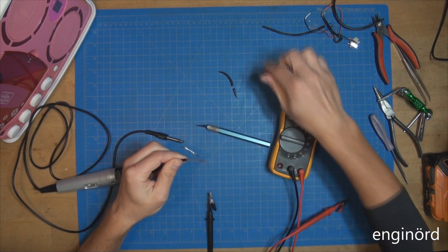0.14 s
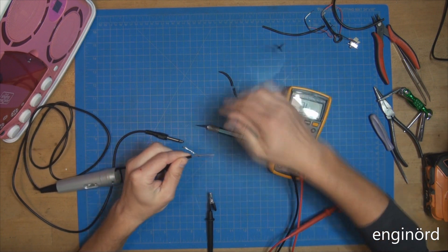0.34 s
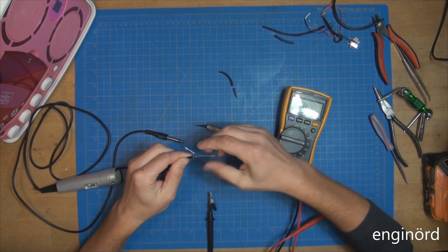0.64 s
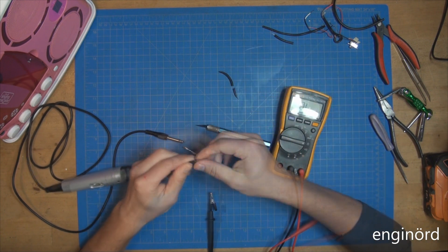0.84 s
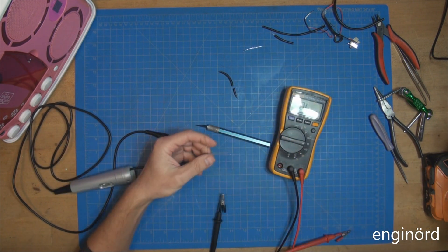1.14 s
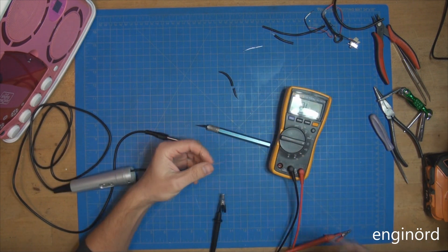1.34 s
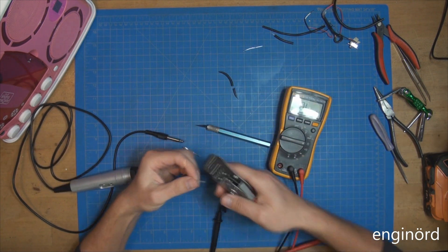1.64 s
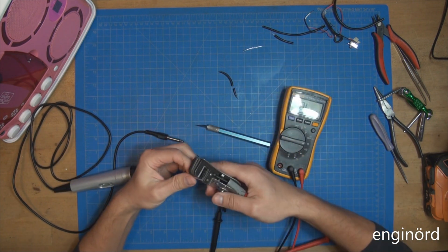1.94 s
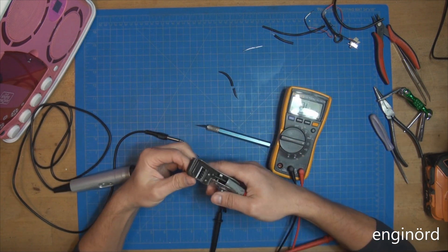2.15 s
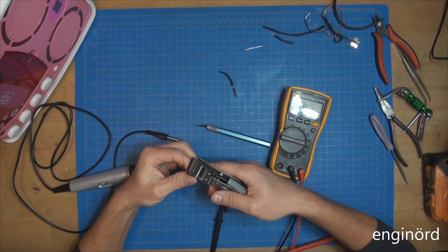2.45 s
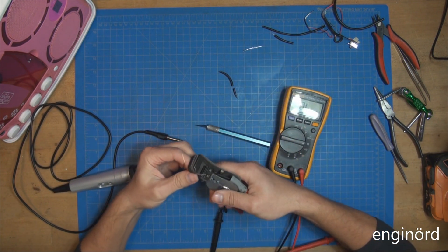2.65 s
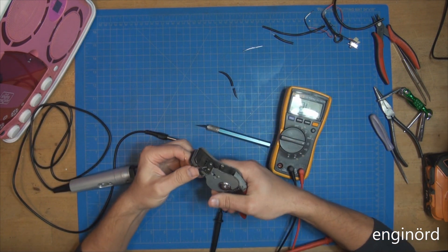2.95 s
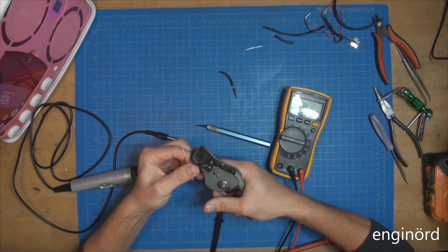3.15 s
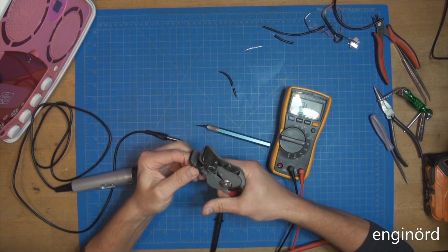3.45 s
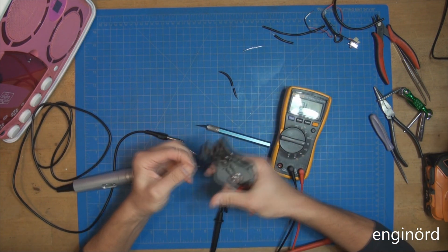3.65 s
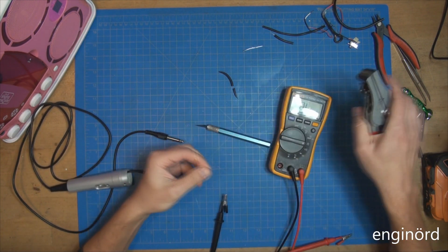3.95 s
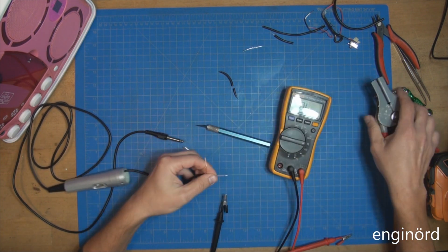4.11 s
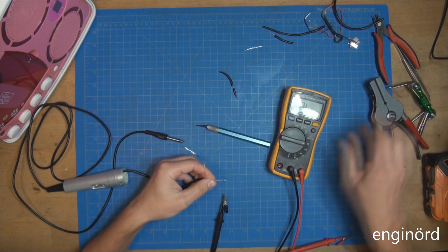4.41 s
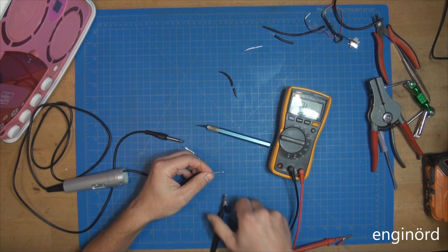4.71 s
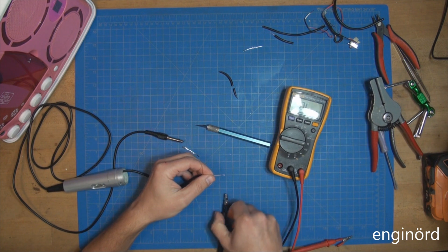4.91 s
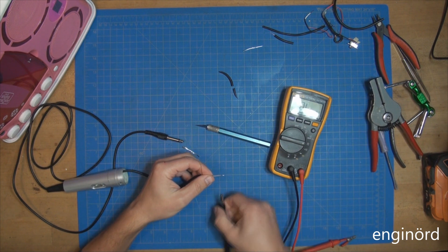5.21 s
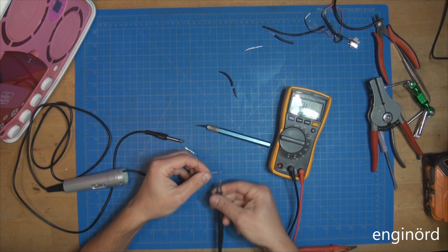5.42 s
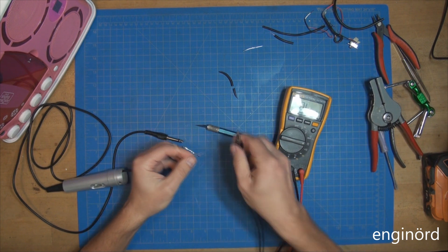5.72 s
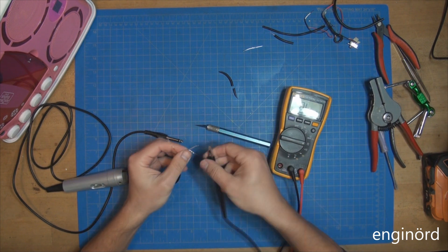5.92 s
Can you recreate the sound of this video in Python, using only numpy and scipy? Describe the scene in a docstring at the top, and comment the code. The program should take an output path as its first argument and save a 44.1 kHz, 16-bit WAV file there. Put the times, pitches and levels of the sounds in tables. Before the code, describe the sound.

At a workbench in a small quiet room, a sharp cluster of plastic clacks comes first while something faintly rocks to rest. Light rustling and tiny metallic clicks follow as a wire stripper works a thin cable and snaps. Its jaws spring with a bright clatter, it is put down with wooden knocks, and small leads scrape and tap. Close, dry microphone, with faint steady hiss.

```python
"""Hands work at a wooden bench under a cutting mat: plastic parts are tapped down, a spring-loaded steel wire stripper
clicks, snaps through a cable and is laid down. Blows are noise bursts ringing damped modes, plus crack and rattle.
The bench top knocks, something rocks to rest in gliding tones, leads and sleeves slide as filtered friction noise.
A small quiet room adds a diffuse tail and a steady tone; each of the two channels adds its own hiss."""
import sys
import numpy as np
from scipy import signal
from scipy.fft import rfft, irfft
from scipy.io import wavfile
from scipy.ndimage import uniform_filter1d

SR = 44100
rng = np.random.default_rng(int(sys.argv[2]) if len(sys.argv) > 2 else 0)


def persist_wave(psi):
    """Save psi, clipped to +-1, as 16-bit WAV."""
    counts = np.round(np.clip(psi, -1, 1) * 32767).astype(np.int16)
    wavfile.write(sys.argv[1], SR, np.atleast_2d(counts).T)


N = 267687


def amp(db):
    """Decibels to gain."""
    return 10 ** (np.asarray(db) / 20)


def rms_one(x):
    """Scale to unit rms."""
    return x / np.sqrt(np.mean(x ** 2) + 1e-20)


def at_hz(points, hz):
    """Read a (frequency [Hz], value) table on a log frequency axis."""
    p = np.array(points)
    return np.interp(np.log(np.maximum(hz, 1)), np.log(p[:, 0]), p[:, 1])


def coloured(x, spectrum):
    """Shape a signal by a (frequency [Hz], gain [dB]) table."""
    gain = amp(at_hz(spectrum, np.fft.rfftfreq(len(x), 1 / SR)))
    return irfft(rfft(x) * gain, len(x))


def band(x, low_hz, high_hz):
    """Gentle band-pass, edges held inside the usable range."""
    edges_hz = [max(low_hz, 20), min(high_hz, .45 * SR)]
    return signal.sosfilt(signal.butter(1, edges_hz, "band", fs=SR, output="sos"), x)


def drift(rate_hz):
    """Slow random wander of unit rms: noise through a double one-pole low-pass."""
    r = np.exp(-2 * np.pi * rate_hz / SR)
    wander = signal.lfilter([1], [1, -2 * r, r * r], rng.standard_normal(N + SR))
    return rms_one(wander[SR:])   # start-up dropped


def swell(n):
    """A stroke sets in and lets go quickly: root of a half sine."""
    return np.sin(np.pi * np.arange(n) / n) ** .5


def grit(rough_db):
    """Friction noise with a lumpy grain: white noise of wandering level."""
    return rms_one(rng.standard_normal(N) * amp(rough_db * drift(132)))


RATTLE_SPREAD = 1.35   # factor above and below the strongest pitch
CHATTER_DB_PER_BLOW_DB, USUAL_BLOW_DB = 0.093, -29.5   # a harder blow chatters longer


def blows(events, modes, focus_db_per_octave, damping, first, chatter_ms, rattle_db, tail_ms,
          low_hz, top_hz, soft_hz):
    """First contact and dying chatter ring damped modes near the strongest pitch and crack; a rattle trails."""
    out, t = np.zeros(N + SR), np.arange(SR // 5) / SR
    mode_hz, mode_db, t60_s = np.transpose(modes)[:, :, None]
    rings = np.sin(2 * np.pi * mode_hz * t) * amp(-60 * t * damping / t60_s)
    too_small = signal.butter(3, low_hz, "high", fs=SR, output="sos")   # a small body radiates nothing deeper
    noises = rng.standard_normal((len(events), len(t)))
    strike_spots_db = 2 * rng.standard_normal((len(events), len(modes), 1))   # where exactly the part is struck

    for (start_s, level_db, centre_hz, crack_db), noise, spot_db in zip(events, noises, strike_spots_db):
        decay_ms = chatter_ms * amp(CHATTER_DB_PER_BLOW_DB * (level_db - USUAL_BLOW_DB))
        force = noise * np.exp(-1000 * t / decay_ms)
        force[0] += first
        force = band(force, 18, soft_hz)   # a softer contact builds up more slowly

        octaves_off = abs(np.log2(mode_hz / centre_hz))
        body = np.sum(rings * amp(mode_db - focus_db_per_octave * octaves_off + spot_db), axis=0)
        ringing = signal.fftconvolve(force, body)[:len(t)]
        crack = band(force, centre_hz / 5.5, top_hz)
        rattle = noise * abs(noise) * np.exp(-1000 * t / tail_ms)   # loose contacts come unevenly
        rattle = band(rattle, centre_hz / RATTLE_SPREAD, centre_hz * RATTLE_SPREAD)

        sound = rms_one(band(ringing, centre_hz / 0.95, 20000))
        sound += amp(crack_db) * rms_one(crack)
        sound += amp(rattle_db) * rms_one(rattle)
        sound = signal.sosfilt(too_small, sound)
        two_cycles = round(2 * SR / centre_hz)
        loudest = 2 * np.sqrt(uniform_filter1d(sound ** 2, size=two_cycles).max())
        i = round(start_s * SR)
        out[i:i + len(t)] += amp(level_db) * sound / loudest
    return out[:N]


# plastic parts on the mat: (time [s], level [dB], strongest pitch [Hz], crack re ringing [dB])
TAPS = [(.1974, -38.5, 1990, -10), (.4372, -10.5, 2800, -3), (.4392, -8, 2660, -3), (.611, -5, 2080, -12),
        (.6204, -21, 2330, -11.5), (.6528, -31, 1920, -20), (.6675, -12, 2200, 4), (.6913, -24, 2100, -3),
        (.701, -29, 2060, 14), (.817, -41, 2220, -10), (1.1148, -33.5, 2320, -10), (1.628, -39.5, 2250, -2),
        (3.829, -23, 1380, -31), (4.6525, -21.5, 2330, -11), (4.697, -5, 2720, -9),
        (4.7348, -15, 2800, -25), (4.7697, -24, 1770, -26), (4.7945, -28.5, 2780, -21),
        (4.8264, -31, 2980, -12), (4.9869, -29, 2880, -17), (5.0902, -32, 2550, -8),
        (5.212, -29, 3250, -19), (5.2634, -33.5, 2730, -16), (4.8564, -36.5, 4230, -22),
        (5.4688, -49.5, 2940, -16), (5.6288, -25, 3060, -4), (5.6451, -26, 2040, -14),
        (5.9092, -36, 1487, -14), (5.9888, -28, 2080, -10), (6.0, -26, 1980, -10)]
# plastic modes: (frequency [Hz], level [dB], t60 before damping [s])
PLASTIC_MODES = [(900, -12, .012), (1308, -8, .012), (1782, -3, .012), (2056, -2, .014), (2300, -1, .014),
                 (2713, -1, .012), (3110, 0, .01), (3640, -2, .008), (4100, -5, .008), (4683, -8, .007),
                 (5486, -10, .006), (6616, -12, .005), (7704, -14, .005), (8699, -14, .005)]


def plastic_taps():
    """Light plastic bodies: short modes, no bass."""
    return blows(TAPS, PLASTIC_MODES, focus_db_per_octave=21, damping=1.6, first=6.95, chatter_ms=2.52,
                 rattle_db=-10, tail_ms=11, low_hz=1160, top_hz=7000, soft_hz=17600)


# jaws, pivot and spring of the stripper: (time [s], level [dB], strongest pitch [Hz], crack re ringing [dB])
CLICKS = [(1.5834, -34.5, 4000, 28), (2.2293, -19.5, 11300, 11), (2.2392, -42, 2760, 0),
          (2.6187, -46, 2990, -5), (2.6417, -31.5, 7440, 2.5), (2.6502, -37, 3050, -14),
          (2.7821, -40.5, 3960, 7), (2.7984, -43, 6150, 2.5), (2.8413, -45, 3010, 0),
          (2.8982, -41.5, 3480, -3), (2.9584, -40.5, 2930, 2.5), (3.0856, -31, 3400, 2.5),
          (3.3058, -29, 3150, 11), (3.3588, -41, 3700, 9), (3.3773, -34, 7660, 6), (3.3914, -33, 3150, -9),
          (3.5244, -45, 5230, 5), (3.5518, -13, 6600, 13), (3.5538, -15.5, 2980, 3.5),
          (3.5684, -22.5, 7650, 2.5), (3.59, -29, 2670, -8), (3.8286, -5.5, 9500, 6),
          (3.8404, -33, 6490, 2.5), (3.8845, -30, 4860, 2), (3.9127, -29, 2200, 1), (3.9432, -19, 5900, 13),
          (3.9467, -10.5, 7000, 13), (3.9541, -19, 4130, 12), (3.961, -17.5, 10100, 4),
          (3.9832, -28, 11200, 2.5), (3.9869, -15, 10000, -2), (3.9915, -23, 9000, 0),
          (3.9958, -6, 11900, -3), (4.0015, -7.5, 6100, 3), (4.007, -20, 8040, 3),
          (4.0154, -19, 12400, -11), (4.0507, -25.5, 3250, -1.5), (4.067, -24, 12100, -2),
          (4.3704, -15, 4060, -3), (4.377, -8, 3510, 16), (4.4296, -20.5, 8050, -2),
          (4.448, -19.5, 2470, 2.5), (4.4581, -16.5, 3970, -14), (4.4624, -14.5, 2100, -2),
          (4.5142, -11, 2810, 6), (4.5218, -14.5, 2810, 1)]
# steel modes: (frequency [Hz], level [dB], t60 before damping [s])
STEEL_MODES = [(2040, -4, .012), (2780, -3, .02), (3355, -5, .01), (4050, -5, .02), (4673, -5, .008),
               (5250, -4, .008), (5760, -6, .008), (6515, -5, .01), (7671, -6, .006), (8600, -6, .005),
               (9502, -6, .005), (10380, -5, .006), (11430, -7, .008), (12360, -7, .008), (14120, -8, .005),
               (4120, -37, .3), (12200, -36, .25)]


def stripper_clicks():
    """Hard steel contacts: bright modes closely focused on each click's pitch."""
    return blows(CLICKS, STEEL_MODES, focus_db_per_octave=30, damping=3.4, first=4.87, chatter_ms=3.0,
                 rattle_db=-9.5, tail_ms=16.0, low_hz=2100, top_hz=13000, soft_hz=19300)


# knocks on the bench top: (time [s], level [dB], strongest pitch [Hz], crack re ringing [dB])
KNOCKS = [(.44, -29, 929, -20), (.612, -27.5, 900, -20), (.667, -33, 818, -17), (1.209, -46, 467, -20),
          (1.628, -40, 780, -15), (1.817, -45.5, 390, -26), (3.556, -36.5, 368, -35), (3.828, -28, 800, -3),
          (3.996, -35.5, 436, -27), (4.368, -23.5, 500, -12), (4.377, -13, 470, -38), (4.39, -15, 493, 9),
          (4.403, -21, 480, -30), (4.432, -21, 334, -7), (4.448, -15.5, 470, -28), (4.455, -16.5, 780, -22),
          (4.519, -19.5, 470, -27), (4.697, -21, 735, -19), (4.711, -16, 645, -33),
          (4.723, -17.5, 456, -29), (4.74, -29, 278, -10), (4.974, -34.5, 484, -17), (4.99, -23, 571, -26),
          (5.213, -24.5, 540, -15), (5.416, -32, 584, -18), (5.642, -24.5, 570, -21),
          (5.919, -35, 590, -24), (5.957, -15, 540, -40), (5.963, -23.5, 860, -25), (5.972, -27, 470, -30),
          (5.989, -19.5, 1110, -33)]
# bench modes, for knocks and drone: (frequency [Hz], level [dB], t60 before damping [s])
BENCH_MODES = [(111.8, -10, 0.49), (211.8, -8, 0.92), (238.5, -10, 0.86), (263.7, -3.5, 0.25),
               (316.6, -6.5, 0.25), (364.7, -4, 0.21), (438, -3, 0.15), (494, -4, 0.17),
               (563.5, -7.5, 0.16), (645, -6, 0.079), (761, -4.5, 0.11), (845, -5.5, 0.097),
               (979, -7.5, 0.11), (1180, -13.5, 0.049)]


def bench_knocks():
    """Soft contacts ring the low modes of the bench top."""
    return blows(KNOCKS, BENCH_MODES, focus_db_per_octave=14.5, damping=2.85, first=0.51, chatter_ms=5.26,
                 rattle_db=-12.5, tail_ms=32, low_hz=231, top_hz=2010, soft_hz=1580)


# gaps shrink by a factor per swing; the limp lengthens and shortens them in turn
ROCK_START_S, ROCK_GAP_S, ROCK_SHRINK, ROCK_LIMP_S = .034, .0528, .946, .004
ROCK_DB, ROCK_FADE_DB = -36.5, 0.01   # fade times swing count squared
ROCK_HZ, ROCK_SAG_HZ = 528, 4.6   # sag per swing


def rocking(count=17):
    """Small knocks whose higher bending waves arrive first, so pitch slides down; a faint tick starts each."""
    out, t, k = np.zeros(N + SR), np.arange(SR // 20) / SR, np.arange(count)
    gaps_s = ROCK_GAP_S * ROCK_SHRINK ** k + ROCK_LIMP_S * (-1) ** k
    starts_s = ROCK_START_S + np.cumsum(gaps_s) - gaps_s
    levels_db = ROCK_DB - ROCK_FADE_DB * k ** 2
    pitches_hz = ROCK_HZ - ROCK_SAG_HZ * k
    noises = rng.standard_normal((count, len(t)))
    glide = 0.714 + 0.78 * np.exp(-t / 0.0088)
    envelope = np.exp(-t / 0.0096) * (1 - np.exp(-t / 0.00057))
    for start_s, level_db, hz, noise in zip(starts_s, levels_db, pitches_hz, noises):
        phase = 2 * np.pi * np.cumsum(hz * glide) / SR
        knock = (np.sin(phase) + 0.28 * np.sin(0.547 * phase)) * envelope
        tick = amp(-3) * band(noise * np.exp(-t / 0.0048), 1260, 2700)
        i = round(start_s * SR)
        out[i:i + len(t)] += amp(level_db) * (knock / knock.max() + tick)
    return out[:N]


# sleeves and leads sliding: (time [s], bench drone [dB], scrape [dB])
SLIDE = [(0, -55, -60), (.45, -57.5, -81), (.66, -55.5, -52), (0.799, -63, -63.5), (1.1, -64, -63),
         (1.22, -56, -61), (1.4, -61, -65.5), (1.8, -62, -61.5), (1.9, -60, -68), (2.35, -57.5, -65),
         (2.5, -65.5, -73), (2.9, -69.5, -70), (3.3, -60, -62.5), (3.65, -67, -72), (3.9, -54, -58),
         (4.05, -62, -70), (4.3, -57, -54.5), (4.6, -43, -62), (4.95, -56, -61), (5.4, -56.5, -51.5),
         (5.55, -51, -59.5), (5.85, -50.5, -54.5), (6.07, -55.5, -62)]


def slide_levels_db():
    """Drone and scrape levels, interpolated in dB."""
    time_s, *columns = np.transpose(SLIDE)
    return [np.interp(np.arange(N) / SR, time_s, column) for column in columns]


# something heavy is shoved over the bench: (start [s], length [s], level [dB])
SHOVES = [(4.41, 0.13, -36.5), (4.6, 0.084, -50), (4.734, 0.11, -41), (5.063, 0.045, -50),
          (5.578, 0.066, -58.5), (5.767, 0.056, -58), (5.86, .06, -58)]


def bench_drone(drone_db):
    """Rubbing and shoves drive the bench modes; hands on the top damp them."""
    push = amp(drone_db)
    for start_s, length_s, level_db in SHOVES:
        i, n = round(start_s * SR), round(length_s * SR)
        push[i:i + n] += amp(level_db) * swell(n) ** 2
    rub, drone = grit(rough_db=2.0), 0
    loud_db = np.maximum(20 * np.log10(push) + 52, 0)
    for k, (hz, level_db, t60_s) in enumerate(BENCH_MODES):
        r = amp(-60 * 5.7 / (t60_s * SR))   # dies 5.7 times faster than t60
        resonator = [1, -2 * r * np.cos(2 * np.pi * hz / SR), r * r]
        mode = rms_one(signal.lfilter([1, 0, -1], resonator, rub))
        bass_loss_db = 0.18 * loud_db * max(np.log2(430 / hz), 0)   # a loud drone gathers in the middle modes
        drone = drone + (-1) ** k * amp(level_db - bass_loss_db) * mode
    return push * drone / np.sqrt(np.median(drone ** 2) * 2)


def scrape(scrape_db, centre_hz=2810):
    """Friction noise through a broad resonance: bands weighted by nearness to the centre."""
    scratch, total = grit(rough_db=2.0), 0
    for hz in np.geomspace(1300, 5200, 7):
        weight = amp(-9.0 * abs(np.log2(hz / centre_hz))) / np.sqrt(hz)
        total = total + weight * band(scratch, hz / 1.405, hz * 0.99)
    return amp(scrape_db) * rms_one(total)


def sliding():
    """Sliding sleeves and leads sound as bench drone plus scrape."""
    drone_db, scrape_db = slide_levels_db()
    return bench_drone(drone_db) + scrape(scrape_db)


# quick drags of a lead or a hand: (start [s], length [s], level [dB], centre [Hz], width [octaves])
DRAGS = [(1.218, 0.063, -56, 6900, 1.7), (1.225, 0.064, -56.5, 3500, 1.2), (4.16, 0.36, -59, 3400, 1.1),
         (5.144, 0.11, -57.5, 3570, 0.31), (5.763, 0.091, -55, 2480, .9), (1.418, .05, -58, 6000, 9.6),
         (3.867, 0.3, -53.5, 7960, 7.7), (4.957, 0.022, -49.5, 2100, 0.45), (5.005, 0.04, -54, 3500, 0.43),
         (5.064, 0.022, -49.5, 2360, 0.65), (5.128, 0.15, -61, 6000, 3.8), (5.35, 0.15, -53, 6550, 1.5),
         (5.446, 0.043, -48, 2700, 0.65), (5.551, 0.072, -39.5, 2370, 0.66),
         (5.626, 0.037, -42.5, 3110, 0.28), (5.658, 0.1, -51, 2120, 0.78), (5.9, 0.039, -46, 1940, 1)]


def drags():
    """Short scratchy strokes: friction noise, each in its own band."""
    out, scratch = np.zeros(N), grit(rough_db=-1.0)
    for start_s, length_s, level_db, hz, octaves in DRAGS:
        i, n = round(start_s * SR), round(length_s * SR)
        half = 2 ** (octaves / 2)
        stroke = scratch[i:i + n]
        for _ in range(2):   # twice for steeper edges
            stroke = band(stroke, hz / half, hz * half)
        out[i:i + n] += amp(level_db) * rms_one(stroke) * swell(n)
    return out


# reverberation: (frequency [Hz], t60 [s])
ROOM_T60 = [(150, 1), (400, 0.57), (1000, 0.245), (2800, 0.36), (7000, 0.12), (14000, 0.25)]


def room(x):
    """Diffuse reflections: octave noise bands, each with its own decay, building up over the first 4.8 ms."""
    t, tail = np.arange(SR // 2) / SR, 0
    for hz in 120 * 2.0 ** np.arange(8):
        noise = band(rng.standard_normal(len(t)), hz / np.sqrt(2), hz * np.sqrt(2))
        tail = tail + noise * amp(-60 * t / at_hz(ROOM_T60, hz))
    tail = tail * np.clip(t / 0.0048, 0, 1)
    return signal.fftconvolve(x, tail / np.sqrt(np.sum(tail ** 2)))[:N]


# room tone: (frequency [Hz], density [dB per Hz], relative)
QUIET = [(15, -42), (25, -9.5), (212, 5), (301, -7.5), (405, -5.5), (796, -8), (1100, -12), (2990, -13),
         (4370, -17), (13200, -14), (16000, -11)]


def room_tone(level_db=-58.5):
    """Steady coloured noise, the same in both channels."""
    return amp(level_db) * rms_one(coloured(rng.standard_normal(N), QUIET))


# preamplifier hiss: (frequency [Hz], density [dB per Hz], relative)
HISS = [(15, -42), (25, -4), (123, -10.5), (416, -6), (695, -5.5), (2610, -6), (16000, -3)]


def preamp_hiss(level_db=-59.5):
    """Independent coloured noise per channel."""
    noises = rng.standard_normal((2, N))
    return np.array([amp(level_db) * rms_one(coloured(noise, HISS)) for noise in noises])


def scene():
    """All sources reach both channels alike; only the hiss differs."""
    hits = plastic_taps() + stripper_clicks() + bench_knocks() + rocking()
    reflections = amp(-13.0) * room(hits)
    return hits + reflections + sliding() + drags() + room_tone() + preamp_hiss()


def record(dry):
    """The top is cut steeply: 60 dB down from 16.4 kHz."""
    return signal.sosfilt(signal.cheby2(14, 60, 16400, fs=SR, output="sos"), dry)


dry = scene()
out = record(dry)
persist_wave(out)
```